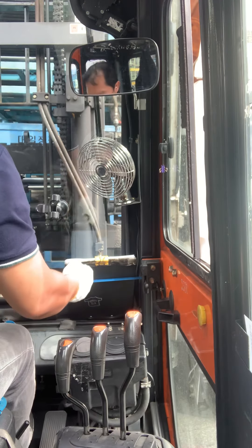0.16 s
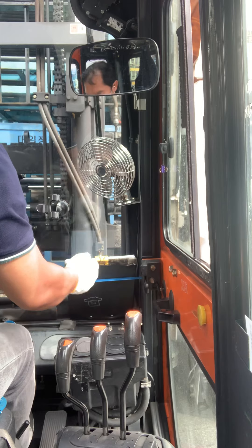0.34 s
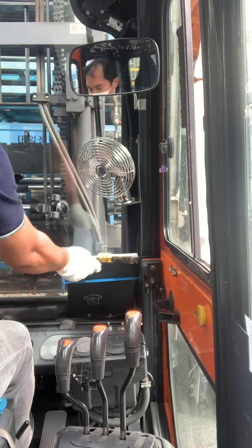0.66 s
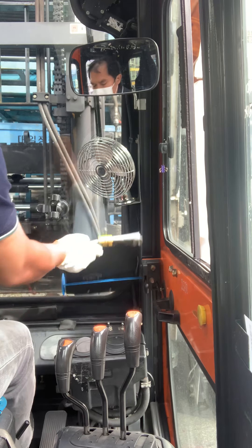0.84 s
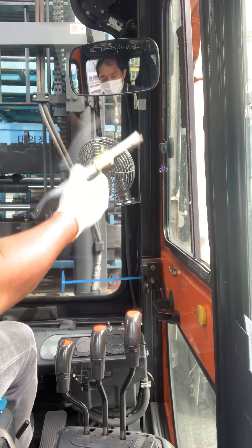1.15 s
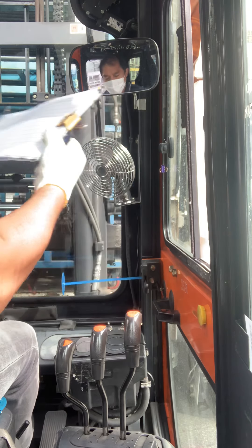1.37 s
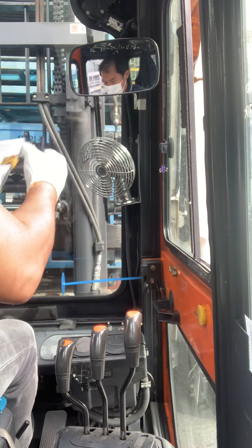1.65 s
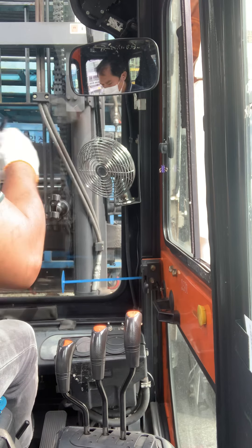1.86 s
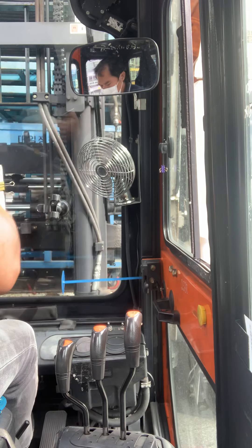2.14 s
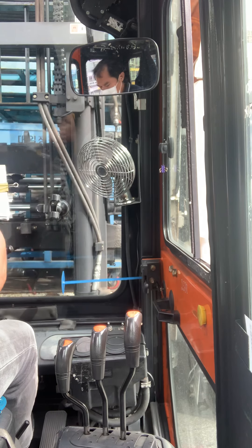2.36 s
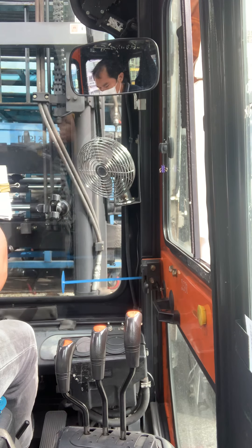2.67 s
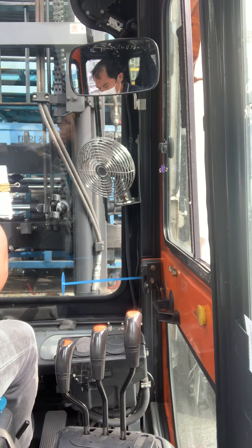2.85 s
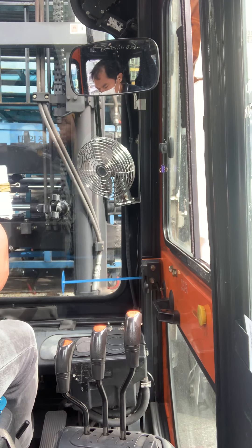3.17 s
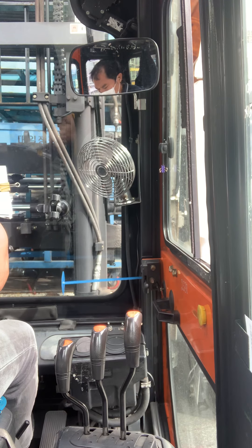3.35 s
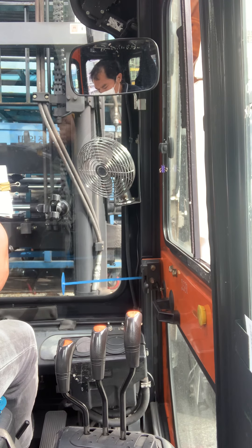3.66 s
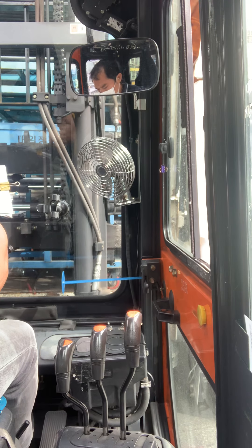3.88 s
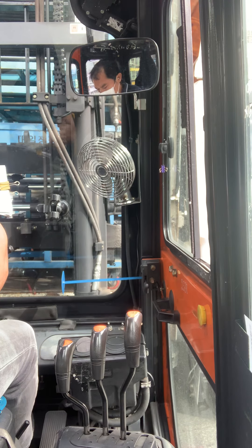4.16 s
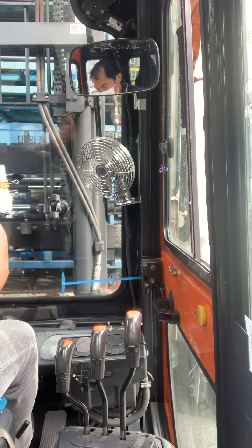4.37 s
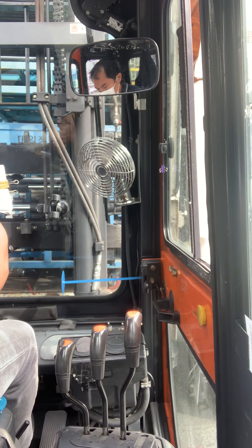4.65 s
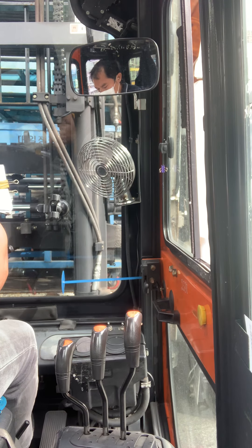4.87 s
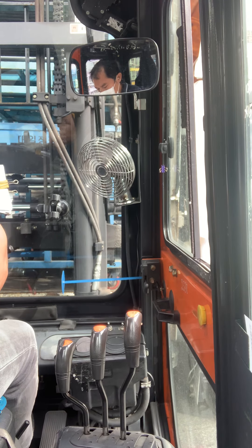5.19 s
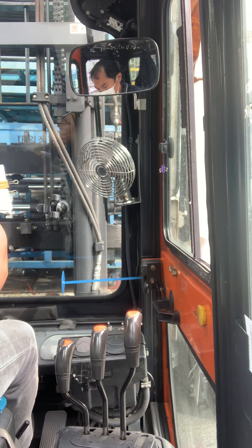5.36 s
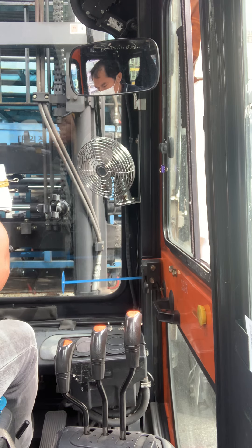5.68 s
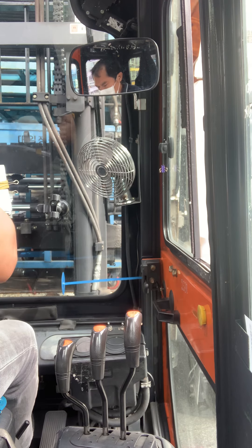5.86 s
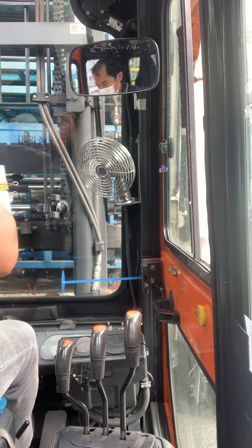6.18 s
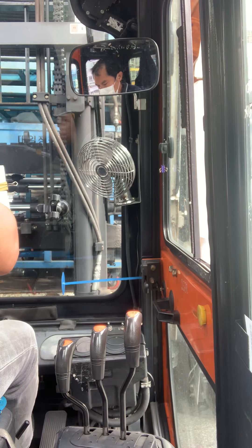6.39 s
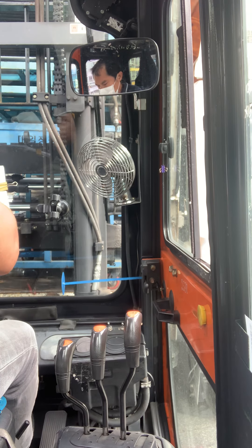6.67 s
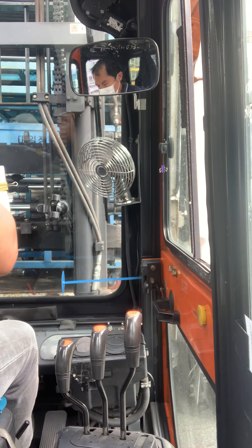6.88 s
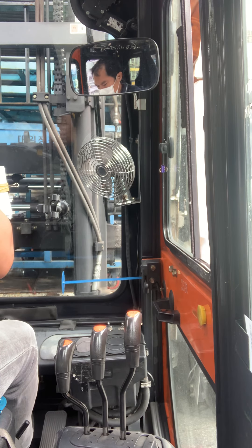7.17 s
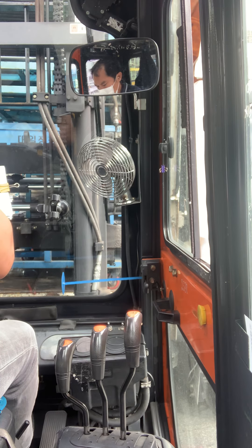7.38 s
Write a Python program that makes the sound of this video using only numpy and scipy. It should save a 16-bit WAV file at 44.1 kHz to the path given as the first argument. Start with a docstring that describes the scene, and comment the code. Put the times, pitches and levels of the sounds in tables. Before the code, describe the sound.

A forklift engine idles inside the cab with a low throbbing hum, ticking and light rattles, while a clipboard briefly scrapes off the dashboard.

```python
"""A four-cylinder forklift engine idles under the floor of a closed cab, its firing orders booming.
Combustion roar throbs through the resonant panels, valve gear knocks and ticks, loose trim chatters
and belt-driven pumps whine. Early on the driver pulls a clipboard off the dash, and the muffled
middle of the engine sound clears. Every source is a mid and a side signal at a two-port microphone."""
import sys
import numpy as np
from scipy import signal
from scipy.fft import rfft, irfft, next_fast_len
from scipy.io import wavfile
from scipy.ndimage import uniform_filter1d

SR = 44100
rng = np.random.default_rng(int(sys.argv[2]) if len(sys.argv) > 2 else 0)


def transcribe(u):
    """Save the signal u as a 16-bit wav file named by the first command-line argument.

    u: samples, shape (n,) or (channels, n), limited to [-1, 1]; the rate is SR.
    q: integer samples, one column per channel.
    """
    v = np.clip(np.atleast_2d(u).T, -1, 1)
    q = np.round(v * 32767).astype(np.int16)
    wavfile.write(sys.argv[1], SR, q)


N = 332073
TIME = np.arange(N) / SR
CLEAR_DB = -4.5  # the shadow that remains once arm and board are drawn back

# Engine speed. Each row: time in seconds, shaft turns a second.
SHAFT_SPEED = [(0.0, 13.43), (0.9, 13.486), (1.25, 13.485), (1.85, 13.466), (2.9, 13.493), (3.55, 13.488),
               (4.4, 13.5), (5.15, 13.466), (5.75, 13.463), (6.55, 13.47), (7.53, 13.457)]
# Coherence of side with mid. Each row: frequency in Hz, share in step, share a quarter cycle ahead.
COHERENCE = [(50, -0.098, -0.34), (90, 0.042, 0.072), (171, -0.57, 0.28), (260, 0.0053, -0.083),
             (550, -0.22, 0.11), (900, -0.07, 0.054), (1400, 0.13, -0.6), (2300, -0.018, -0.36),
             (3500, 0, .3), (4400, -0.063, -.05), (5600, 0, .45), (7500, 0, -.45), (10500, 0, -.72),
             (12500, 0, 0)]


def gain_of(db):
    """Decibels as an amplitude ratio."""
    return 10 ** (np.asarray(db) / 20)


def unit_rms(x):
    """Normalisation to rms 1."""
    return x / np.sqrt(np.mean(x ** 2) + 1e-20)


def spectrum_at(points, hz):
    """Interpolation of a table's columns on a log-frequency axis."""
    freqs, *columns = np.transpose(points)
    return np.array([np.interp(np.log(hz + 1), np.log(freqs + 1), column) for column in columns])


def shaft_hz():
    """The shaft's rotation frequency at every sample."""
    return np.interp(TIME, *np.transpose(SHAFT_SPEED))


def drift(per_s):
    """Low-pass noise of rms 1, with about per_s changes a second."""
    knots, span = np.arange(0, N / SR + 1, .01), max(1, round(50 / per_s))
    smooth = uniform_filter1d(rng.standard_normal(len(knots)), span)
    return np.interp(TIME, knots, unit_rms(uniform_filter1d(smooth, span)))


def shadow_db(start_db=-10, clearing_s=1):
    """Acoustic shadow: arm and board muffle the engine's middle range, less as they are drawn back."""
    return CLEAR_DB + (start_db - CLEAR_DB) * np.exp(-TIME / clearing_s)


def tone(hz, phase, mid_db, side_db):
    """A sinusoid in mid and side, with the phase difference the ports give at that frequency."""
    in_step, ahead = spectrum_at(COHERENCE, hz)
    lead = np.arctan2(ahead, in_step)
    return np.sqrt(2) * np.array([gain_of(mid_db) * np.cos(phase),
                                  gain_of(side_db) * np.cos(phase + lead)])


def ring(blows, modes, rise_s, side_db, colour_db):
    """Modal decay: each blow (seconds, dB) excites its own mix; the side lags a quarter cycle."""
    t = np.arange(SR // 5) / SR
    starts, levels_db = np.transpose(blows)
    onsets = np.clip((starts * SR).astype(int), 0, N - 1)
    chance, out = rng.standard_normal((len(starts), len(modes), 2)), 0
    for k, (hz, mode_db, t60) in enumerate(modes):
        force = gain_of(levels_db + colour_db * np.minimum(chance[:, k, 0], 1.6))
        impulses = np.zeros(N, complex)
        np.add.at(impulses, onsets, force * np.exp(1j * chance[:, k, 1]))
        envelope = gain_of(mode_db - 60 * t / t60) * (1 - np.exp(-t / rise_s))
        out += signal.oaconvolve(impulses, envelope * np.exp(2j * np.pi * hz * t))[:N]
    return np.array([out.imag, -gain_of(side_db) * out.real])


def trim_chatter(turn, blows_per_s=120):
    """Random impacts: loose trim rattles, one or two pieces standing out at each blow."""
    # Trim modes. Each row: frequency in Hz, gain in dB, t60 in seconds.
    modes = [(660, -0.5, 0.13), (826, 1, 0.075), (890, -1.5, 0.076), (1136.4, -1.5, 0.086),
             (1377, 3, 0.046), (1491, 5.5, 0.027), (1730, -4.5, 0.11), (1983, 1, 0.071),
             (2210, -0.5, 0.051), (2389, -2.5, 0.047), (2618, -1.5, 0.042), (2770, -2.5, 0.06)]
    place, force = rng.random((round(blows_per_s * N / SR), 2)).T
    place = place * turn[-1]
    place -= .03957 * np.sin(4 * np.pi * (place - .2))  # blows crowd around the firings
    blows = np.transpose([np.interp(place, turn, TIME), -52.5 + 5.9 * force])
    return ring(blows, modes, rise_s=.0057, side_db=1, colour_db=12)


def clipboard(loudest_s=.8, fade_s=.19, low_hz=619, high_hz=1520, glide_s=.051):
    """Friction and impact: the board scrapes in a rising band and bumps the dash as its papers rustle."""
    # Bumps on the dash. Each row: start in seconds, level in dB.
    bumps = [(0.7736, -41), (0.8144, -35), (0.8854, -38)]
    # Board modes. Each row: frequency in Hz, gain in dB, t60 in seconds.
    modes = [(895, 4, 0.013), (1368, 16.5, 0.053), (1490, -3, 0.034)]
    paper, friction = rng.standard_normal((2, 2, N)) * gain_of(3.5 * drift(60))
    rustle = signal.sosfilt(signal.butter(8, [900, 4400], "bandpass", fs=SR, output="sos"), paper)
    swish = signal.sosfilt(signal.butter(8, [5600, 10800], "bandpass", fs=SR, output="sos"), paper)
    since = TIME - loudest_s
    pull = gain_of(-20 * np.minimum((since / fade_s) ** 2, 10))
    centre_hz = low_hz + (high_hz - low_hz) * (1 + np.tanh(since / glide_s + .5)) / 2
    baseband = signal.sosfilt(signal.butter(3, 380, fs=SR, output="sos"), friction)
    scrape = baseband * np.cos(2 * np.pi * np.cumsum(centre_hz) / SR)
    slide = sum(gain_of(db) * unit_rms(x) for x, db in [(rustle, -46), (swish, -52.5), (scrape, -34)])
    return ring(bumps, modes, rise_s=.003, side_db=-6, colour_db=1.5) + slide * pull


def belt_whines(turn):
    """Rotational tones: pumps and fan follow the engine speed and waver with belt slip."""
    # Each row: frequency at mean speed in Hz, mid and side levels in dB, waver in Hz, flicker in dB.
    whines = [(70.3, -40, -62, 0.16, -3), (112, -32, -59, 0.13, 3.5), (220, -65, -60, 0.38, 5),
              (1323, -45, -41.5, 2.68, 2), (1464, -55.5, -52, 5.73, 2)]
    pace, out = shaft_hz() / np.mean(shaft_hz()), 0
    treble_db = .6 * (shadow_db() - CLEAR_DB) + 2.5 * np.cos(2 * np.pi * (turn - .1))
    for hz, mid_db, side_db, waver_hz, flicker_db in whines:
        cycles = np.cumsum(hz * pace + waver_hz * drift(8)) / SR + rng.random()
        swell_db = flicker_db * drift(18) + (hz > 1000) * treble_db
        out += tone(hz, 2 * np.pi * cycles, mid_db, side_db) * gain_of(swell_db)
    return out


def valve_blows(turn, places, hard, modes, spread_db, side_db, rise_s):
    """Periodic impacts: uneven blows near the same places every turn, and hard ones at set times."""
    turns = np.arange(int(turn[-1]) + 1)[:, None]
    place, usual_db = np.transpose(places)
    chance = rng.standard_normal((len(turns), len(place), 2))
    starts = np.interp(turns + place + .0115 * chance[..., 0], turn, TIME).ravel()
    levels_db = (usual_db + spread_db * np.minimum(chance[..., 1], 1.1)).ravel()
    apart = abs(starts[:, None] - np.transpose(hard)[0]).min(1) > .01  # a hard blow replaces a soft one
    soft = np.transpose([starts, levels_db])[apart & (starts > 0)]
    usual = ring(soft, modes, rise_s, side_db, colour_db=2.2)
    accents = np.subtract(hard, [.003, 0])  # a blow starts 3 ms before it peaks
    return usual + ring(accents, modes, rise_s, side_db, colour_db=.8)


def valve_ticks(turn):
    """Impact excitation of the valve gear's high, quickly damped modes."""
    # Usual blows. Each row: place as a fraction of a turn, level in dB.
    places = [(.27, -65), (0.771, -50)]
    # Hard blows. Each row: peak time in seconds, level in dB.
    hard = [(0.1455, -36), (0.327, -38), (0.4778, -36), (0.591, -37), (0.624, -33), (0.9238, -39),
            (1.036, -38), (1.1087, -35.5), (1.258, -39), (1.3314, -36), (1.5155, -41), (1.5524, -36),
            (1.705, -38), (1.7794, -36), (1.9256, -34), (2, -33), (2.2238, -35), (2.5955, -40),
            (4.001, -32), (5.668, -33.5), (5.855, -32.5), (6.0766, -35), (6.228, -33), (6.562, -35),
            (7.0439, -39), (7.1172, -36), (7.3422, -38)]
    # Each row: mode frequency in Hz, gain in dB, t60 in seconds.
    modes = [(2530, -13, 0.013), (2987, 7.5, 0.04), (3120, 2, 0.02)]
    return valve_blows(turn, places, hard, modes, spread_db=4.5, side_db=-7, rise_s=.002)


def valve_knocks(turn):
    """Impact excitation of the valve gear's lower, longer-ringing modes."""
    # Usual blows. Each row: place as a fraction of a turn, level in dB.
    places = [(0.059, -43), (.27, -46.5), (.57, -44)]
    # Hard blows. Each row: peak time in seconds, level in dB.
    hard = [(0.129, -34), (1.0196, -33.5), (1.39, -36), (1.468, -37), (1.7644, -34), (2.801, -33),
            (2.9512, -32.5), (3.3214, -36), (3.5428, -34.5), (3.8393, -34), (3.987, -30.5), (4.13, -35),
            (4.2098, -35), (4.58, -35), (4.99, -31.5), (5.174, -35), (5.471, -31), (5.9165, -30),
            (6.069, -32), (6.1384, -36), (6.216, -32), (6.366, -35), (6.508, -34), (6.525, -36),
            (6.8808, -36), (7.105, -32), (7.4894, -37)]
    # Each row: mode frequency in Hz, gain in dB, t60 in seconds.
    modes = [(1681, 2, 0.06), (1765, -2, 0.04), (1892, 3, 0.078), (2050, -2, 0.12), (2340, -19, 0.039)]
    return valve_blows(turn, places, hard, modes, spread_db=3, side_db=-2.5, rise_s=.00069)


def roar(turn, spectra, bands, mid_db, side_db):
    """Amplitude modulation: combustion noise swells at each firing; panel resonances colour the mid."""
    # Panel resonances and notches. Each row: frequency in Hz, width in Hz, gain in dB.
    panels = [(67, 18, 3.5), (94.4, 6.3, -3.5), (127, 7.4, 1.5), (138.7, 9.4, -15), (151, 39, 1.5),
              (204.6, 15, -2.5), (322, 30, 2.5), (368, 15, -6), (402, 20, -5), (428, 56, 3.5),
              (502, 30, -10), (598, 22, 9), (655, 31.4, -24.5), (672, 28, 11.5), (719, 19, -16),
              (749.3, 33.5, 12), (880, 40, -4.5), (1127, 24, -6.5), (1310, 93, 6), (1465, 44, 11),
              (1615, 69, 4), (1910, 480, 7), (3006, 170, 8), (10430, 560, 6.5)]
    size = next_fast_len(N)
    hz = np.fft.rfftfreq(size, 1 / SR)
    firings = np.arange(int(2 * turn[-1]) + 3)
    common, drive = rng.standard_normal(len(firings)), 0
    for k, (centre_hz, throb_db, place, uneven_db, drift_db, shaded, lope_db, lope_at) in enumerate(bands):
        firing = 2 * (turn - place)
        strengths = .25 * common + .95 * rng.standard_normal(len(firings))
        # the second harmonic flattens each swell and narrows the gaps
        swell_db = throb_db * (np.cos(2 * np.pi * firing) - .3 * np.cos(4 * np.pi * firing))
        swell_db += uneven_db * np.interp(firing + 1, firings, strengths) + drift_db * drift(6.6)
        swell_db += lope_db * np.cos(2 * np.pi * (turn - lope_at))
        flutter_db = 2.8 * np.exp(-((centre_hz - 500) / 300) ** 2)
        swell_db += flutter_db * np.cos(16 * np.pi * (turn - .08))  # eight times a turn
        noise = rng.standard_normal((2, N)) * gain_of(swell_db + shaded * shadow_db())
        share = np.interp(np.log(hz + 1), np.log(np.transpose(bands)[0]), np.arange(len(bands)) == k)
        drive += np.sqrt(share) * rfft(noise, size)
    mid_drive, independent = drive
    in_step, ahead = spectrum_at(COHERENCE, hz)
    coherence = in_step + 1j * ahead
    side_drive = coherence * mid_drive + np.sqrt(np.clip(1 - abs(coherence) ** 2, 0, 1)) * independent
    panels_db = sum(db / (1 + (2 * (hz - centre) / width) ** 2) for centre, width, db in panels)
    mid = irfft(mid_drive * gain_of(spectrum_at(spectra[0], hz)[0] + panels_db), size)[:N]
    side = irfft(side_drive * gain_of(spectrum_at(spectra[1], hz)[0]), size)[:N]
    return np.array([gain_of(mid_db) * unit_rms(mid), gain_of(side_db) * unit_rms(side)])


def combustion_clatter(turn):
    """Modulated broadband noise: the part of the roar mostly above a kilohertz."""
    # Mid spectrum, then side. Each row: frequency in Hz, relative density in dB.
    spectra = ([(530, -42), (900, -0.5), (1050, -3), (1340, -3.5), (1580, -6.5), (2480, -3.5), (3030, -9),
               (3500, -10), (4320, -11), (4870, -30), (5300, -15.5), (6490, -8.5), (10600, -22),
               (11500, -21), (12300, -54), (12600, -75), (22000, -120)], [(530, -33), (900, -5),
               (1240, -8.5), (1340, 0.5), (1530, -6.5), (1930, -8), (2770, -9.5), (4040, -21.5),
               (5500, -18.5), (6140, -21), (7170, -33), (9450, -29.5), (10400, -26), (12600, -30),
               (16000, -30), (22000, -33)])
    # Each row: band centre in Hz, throb in dB, its place in turns, unevenness in dB, drift in dB,
    # share of the shadow, once-a-turn lope in dB, its place in turns.
    bands = [(950, 1, .18, 1.4, 2.5, .4, 0, 0), (1120, 1, .18, 1.4, 2.5, .4, 0, 0),
             (1320, 0.5, 0.18, 1, 0.69, 0.38, 1.6, .1), (2310, 0.37, 0.11, 0.11, 0.72, 0.64, .1, .1),
             (3590, 1.1, 0.24, 1, 0.89, 0.21, .8, .22), (5800, 0.97, 0.18, 1, 0.55, 0.058, .1, .1),
             (7800, 1.1, 0.17, 1, 0.5, 0.08, .1, .1), (10300, 1.44, 0.17, 1.3, 0.6, 0.1, .1, .1)]
    return roar(turn, spectra, bands, mid_db=-38, side_db=-33.5)


def combustion_rumble(turn):
    """Modulated low-frequency noise: the body of the roar, mostly below a kilohertz."""
    # Mid spectrum, then side. Each row: frequency in Hz, relative density in dB.
    spectra = ([(10, -25), (20, -28), (38, -25), (45, -19), (52, -6.5), (82, -7), (129, -7), (183, -8.5),
               (235, -17.5), (376, -16), (437, -13.5), (572, -18.5), (748, -26.5), (946, -41),
               (1100, -36.5), (1430, -52), (2420, -120)], [(12, -52), (20, -22), (58, -16), (163, -4.5),
               (220, -9.5), (293, -4.5), (340, -9.5), (468, -1), (553, -5), (654, -1.5), (1100, -10),
               (1430, -41), (2420, -120)])
    # Each row: band centre in Hz, throb in dB, its place in turns, unevenness in dB, drift in dB,
    # share of the shadow, once-a-turn lope in dB, its place in turns.
    bands = [(70, .6, .1, .4, .3, .1, 0, 0), (200, .8, .2, .5, .3, .2, 0, 0),
             (450, 2.6, .22, .6, .3, .7, .3, .2), (650, 1, .17, 1.2, 2, .7, 2.6, .85),
             (800, 1.3, .15, 1.4, 2.4, .6, 1.5, .85), (950, 1.3, .15, 1.4, 2.4, .6, 0, 0)]
    return roar(turn, spectra, bands, mid_db=-24, side_db=-28)


def firing_boom(turn, spread_db=.6, cab_rad=2.4, floor_hz=161, floor_width_hz=7, floor_lag_rad=5.5):
    """Harmonic superposition: low orders add to one pulse per firing; the panels scatter the high ones."""
    # Each row: multiple of the shaft speed, mid and side levels in dB.
    # Unequal cylinders add the half multiples.
    orders = [(2.0, -41, -73), (4.0, -22.6, -48), (5.0, -31, -55), (6.0, -21.3, -44), (7.0, -47, -62),
              (8.0, -29.6, -43), (9.0, -35, -56), (10.0, -36, -48), (11.0, -44, -48), (12.0, -38, -38),
              (12.5, -44, -70), (13.0, -32.5, -40), (14.0, -40.5, -53), (15.0, -47, -62), (16.0, -43, -50),
              (17.0, -49, -53), (18.0, -48, -52), (20.0, -45, -47), (20.5, -49, -58), (21.5, -50, -66),
              (22.0, -49, -46), (22.5, -61, -49), (23.0, -51, -55), (24.0, -48, -53), (24.5, -49, -57),
              (25.0, -49, -59), (25.5, -61, -56), (26.0, -45, -56), (27.0, -62, -56), (28.0, -48, -45),
              (29.0, -56, -53), (31.0, -48, -48), (32.0, -46, -59), (33.0, -49, -55), (34.0, -42, -48),
              (35.0, -54, -45), (36.0, -56, -46), (37.0, -61, -49), (38.0, -58, -44), (40.0, -49, -53),
              (41.0, -53, -53), (42.0, -47, -52), (42.5, -57, -51), (43.0, -53, -49), (44.0, -45, -50),
              (46.0, -64, -50), (48.5, -58, -56), (49.0, -60, -59), (50.0, -56, -49), (53.5, -58, -56),
              (54.0, -53, -51), (55.5, -55, -60), (56.0, -54, -52), (58.0, -63, -48), (59.0, -62, -66),
              (60.0, -60, -57), (60.5, -63, -52), (61.0, -58, -56)]
    mean_hz, out = np.mean(np.transpose(SHAFT_SPEED)[1]), 0
    firings = np.arange(int(2 * turn[-1]) + 2)
    uneven_db = spread_db * np.interp(2 * turn, firings, rng.standard_normal(len(firings)))
    for order, mid_db, side_db in orders:
        hz, high = order * mean_hz, order > 15
        # the floor pan delays the orders above its resonance
        lag = floor_lag_rad * (.5 + np.arctan((hz - floor_hz) / floor_width_hz) / np.pi)
        scatter = 2 * np.pi * rng.random() + .018 * order * drift(1.5)
        phase = 2 * np.pi * order * turn + cab_rad - lag + high * scatter
        swell_db = (1 if high else .36) * drift(5) + 1.7 * (shadow_db() - CLEAR_DB) * (order > 30)
        out += tone(hz, phase, mid_db, side_db) * gain_of(swell_db + uneven_db)
    return out


def scene():
    """Superposition of all sources; the sum and difference of mid and side give left and right."""
    turn = .311 + np.cumsum(shaft_hz()) / SR  # shaft angle in turns, two firings to each
    cab = firing_boom(turn) + belt_whines(turn) + trim_chatter(turn) + clipboard()
    cab += combustion_rumble(turn) + combustion_clatter(turn)
    cab += valve_knocks(turn) + valve_ticks(turn)
    mid, side = cab
    return np.array([mid + side, mid - side])


def record(dry, cutoff_hz=15750):
    """Band limiting by a linear-phase low-pass filter."""
    lowpass = signal.firwin(1023, cutoff_hz, window=("kaiser", 9), fs=SR)
    return signal.oaconvolve(dry, lowpass[None], "same")


dry = scene()
out = record(dry)
transcribe(out)
```